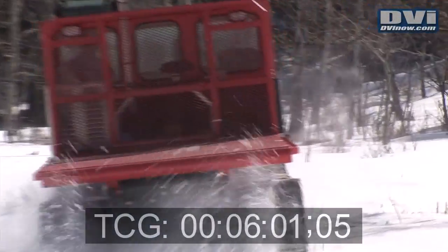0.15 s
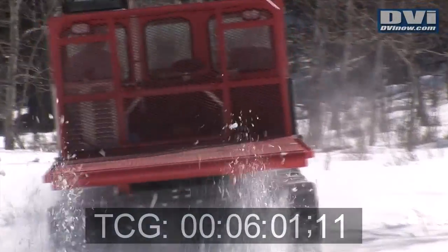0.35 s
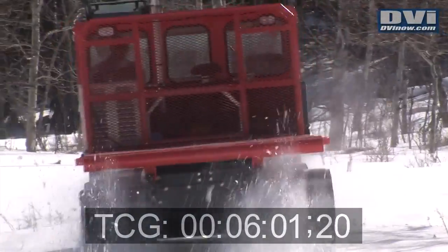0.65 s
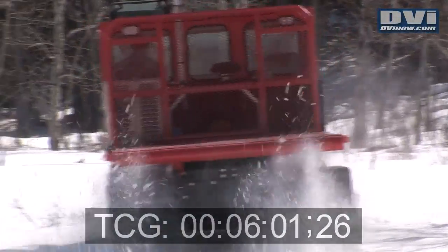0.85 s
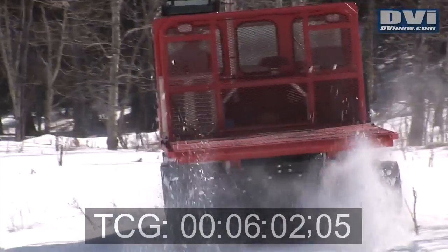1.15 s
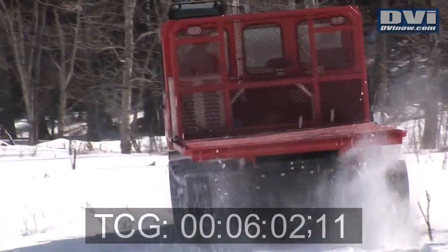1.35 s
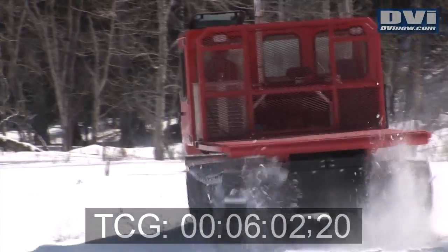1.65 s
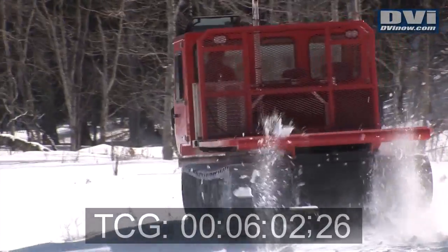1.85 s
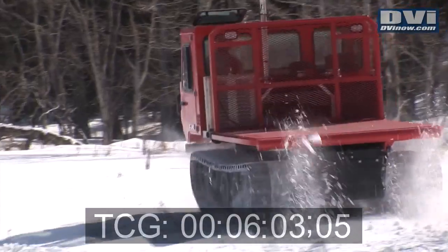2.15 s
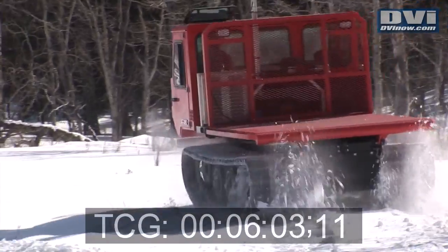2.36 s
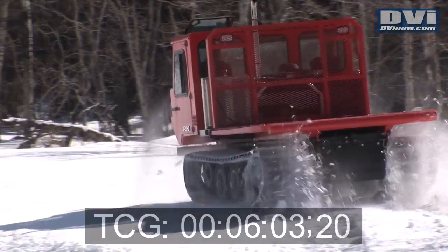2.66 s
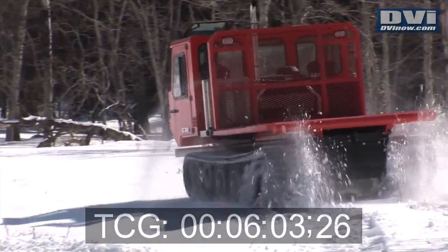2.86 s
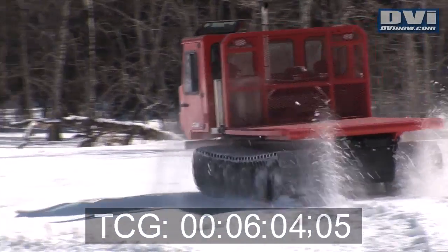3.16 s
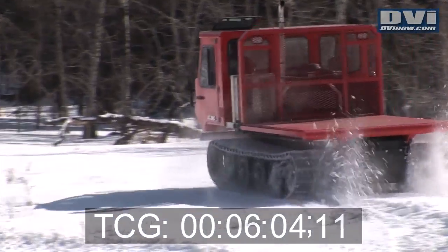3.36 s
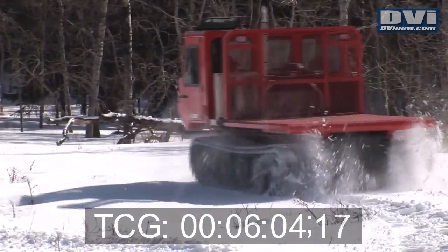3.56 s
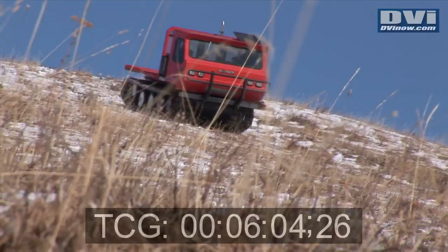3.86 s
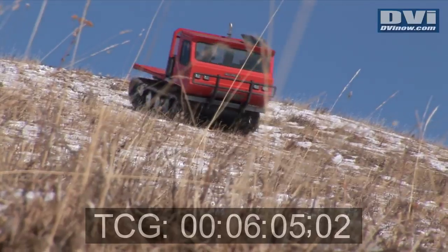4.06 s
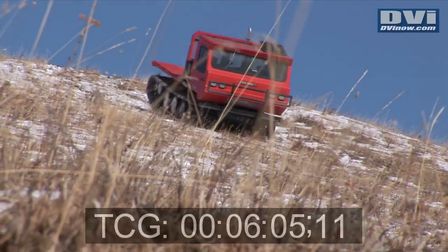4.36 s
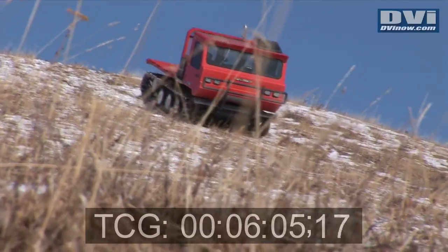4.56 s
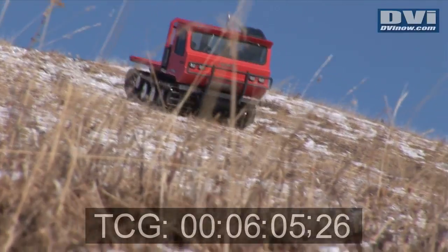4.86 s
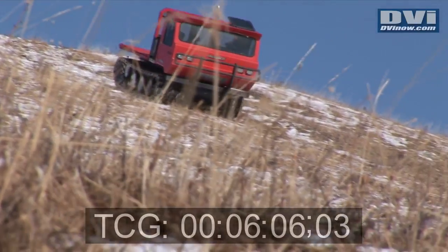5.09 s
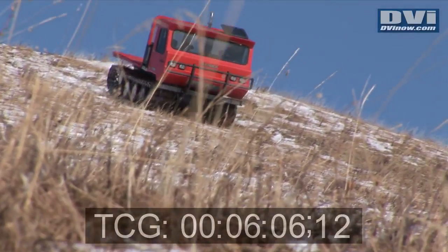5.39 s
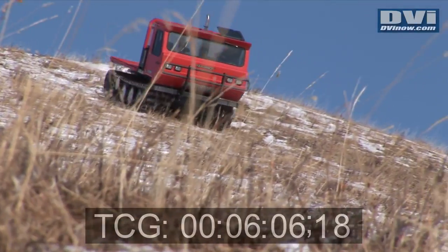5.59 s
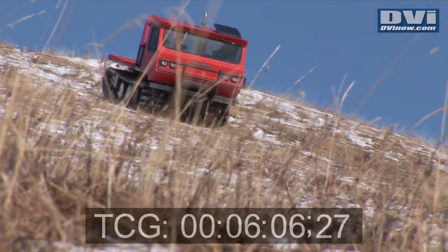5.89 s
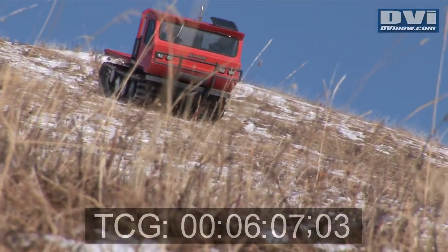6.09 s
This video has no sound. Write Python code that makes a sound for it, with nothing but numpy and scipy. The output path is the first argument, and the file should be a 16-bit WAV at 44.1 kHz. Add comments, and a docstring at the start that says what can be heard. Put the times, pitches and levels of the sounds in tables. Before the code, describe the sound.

Close to the microphone, a tracked diesel vehicle ploughs through deep snow. The exhaust throbs and the hull drums while steel tracks clatter, clink and slap, with churning snow and a faint high whistle. After about four seconds the sound changes abruptly to the same vehicle far off on a hill: a quiet wavering drone, soft low bumps and thin rattling in light wind. A faint electronic whine and hiss run underneath.

```python
"""Tracked carrier in snow, then on a far hill

Close to the microphone a diesel carrier ploughs through deep snow: the exhaust throbs, sprockets hum,
the hull drums, steel tracks clatter and clink, snow sprays and a thin whistle flutters. Then the scene
changes abruptly: the carrier crawls over a distant grassy hill, a low drone with soft bumps and faint
rattle in light wind. The camera's own whine and microphone hiss lie under both."""
import sys
import numpy as np
from scipy import signal
from scipy.fft import rfft, irfft, next_fast_len
from scipy.io import wavfile
from scipy.ndimage import map_coordinates

SR = 44100
rng = np.random.default_rng(int(sys.argv[2]) if len(sys.argv) > 2 else 0)


def materialize(psi):
    """Save the field psi as 16-bit PCM at rate SR to the path in sys.argv[1].

    A 1-D psi becomes a single channel; in a 2-D psi each row is a channel.
    """
    bounded = np.clip(np.atleast_2d(psi).T, -1, 1)
    quanta = np.round(bounded * 32767).astype(np.int16)
    wavfile.write(sys.argv[1], SR, quanta)


N = 274743
T = np.arange(N) / SR
CUT_S = 3.84  # from the snow to the hill
LINK_T60_S, RECEDE_DB_PER_S = 0.16, 1.5  # ring time of a link; fade of hull and sprockets

# At the microphone, whine partials and hiss spectrum: (frequency [Hz], level [dB])
CAMERA_WHINE = [(2397, -79), (2697, -80), (4195, -90), (4795, -79.5), (5095, -85), (5694, -94),
                (6293, -101), (6595, -102)]
MIC_HISS = [(200, 11), (700, 22.5), (2000, -5), (4400, 5), (5000, 9.5), (5500, 3.5), (8000, -6),
            (13000, -7), (14300, -11), (15200, -12)]
# Stereo width of hiss, hill and close pass: (frequency [Hz], side minus mid [dB])
HISS_WIDTH = [(500, 0.5), (3000, -11.5), (8000, 8.5)]
FAR_WIDTH = [(25, -11), (55, -3), (110, -26), (170, -19), (400, -14), (850, -3), (1400, -10.5), (2100, -25),
             (3000, -73), (4400, -45)]
NEAR_WIDTH = [(60, -67), (150, -78), (220, -33), (330, -18.5), (700, -15), (1300, -15.5), (2200, -21.5),
              (3000, -48.5), (4300, -6.5), (5000, -8.5), (6200, 0.5), (8000, -0.5), (10500, -26),
              (15000, 1)]

# Spectra heard from the hill: (frequency [Hz], relative level [dB])
WISP_SPECTRUM = [(10500, -33), (12400, 0), (13200, 0), (14800, -25)]
RUMBLE_SPECTRUM = [(15, -37), (26, -20), (38, -8), (55, -5), (85, 0.5), (115, 1), (150, 1.5), (190, -5),
                   (250, -21), (400, -33), (800, -51.5)]
GRUMBLE_SPECTRUM = [(120, -5), (200, 8), (270, 1), (350, -3), (460, -23), (700, -26), (1500, -44)]
RATTLE_SPECTRUM = [(300, -14), (700, -18.5), (1200, -7), (1420, -10), (1600, -4.5), (1790, -9.5),
                   (1900, -2), (2150, 0), (2400, -0.5), (2560, -4.5), (3150, -5.5), (3320, -13),
                   (3850, -17), (4400, -35), (7000, -58)]
# How hard the distant tracks work: (time [s], level [dB])
FAR_TRACK_WORK = [(3.84, -62), (4.08, -63), (4.27, -62.5), (4.38, -62), (4.47, -62), (4.8, -63),
                  (5.27, -66), (5.55, -61.5), (5.68, -62.5), (5.85, -61), (6.13, -64), (6.23, -62.5)]
# Steel ringing in the distant rattle: (frequency [Hz], width [Hz], level [dB])
FAR_STEEL_MODES = [(851, 50, 9), (1210, 90, -3), (1522, 70, 4), (1715, 92, 3), (2800, 110, -1),
                   (3080, 130, -2)]
# Distant engine drone: (time [s], pitch [Hz])
DRONE_PITCH = [(3.84, 143), (4.05, 144), (4.3, 149), (4.6, 157), (5.15, 157), (5.35, 145), (5.48, 153.3),
               (5.95, 150), (6.23, 153)]
# Track clanks and engine pulls on the hill: (middle [s], half length [s], rise [dB])
FAR_CLANKS = [(4.095, 0.022, 2.5), (4.35, .018, 4), (5.85, .018, 1.5)]
ENGINE_PULLS = [(4.04, 0.043, 13), (4.28, .09, 6.5), (4.62, 0.044, 14.5), (5.2, 0.045, 10), (5.48, 0.04, 4),
                (5.98, 0.071, 7.5)]
# Hull booms on uneven ground, near and far: (time [s], peak [dB], pitch [Hz])
HULL_BUMPS = [(.45, -32.5, 152), (2.0, -35.5, 152), (4.12, -43.5, 110.9), (4.2, -49, 108),
              (4.27, -43, 92.6), (4.34, -47, 96), (4.88, -59, 106), (4.95, -47, 79), (5.04, -47, 125),
              (5.7, -46, 122), (5.86, -56, 133)]

# Close whistle's pitch and engine firing rate: (time [s], frequency [Hz])
WHISTLE_PITCH = [(0, 13000), (.95, 12750), (1.55, 11970), (2.15, 12500), (2.5, 12300), (3.1, 12860),
                 (3.8, 12810)]
FIRING_RATE = [(0, 79.05), (.38, 77.5), (.75, 78.36), (.95, 83.1), (1.5, 79.6), (1.9, 78.7), (2.25, 79.5),
               (2.6, 78.5), (3.3, 79.5), (3.84, 78.8)]
# Load on the drive and work of the running gear, close by: (time [s], level [dB])
DRIVE_LOAD = [(0.0, -26), (0.06, -36), (0.13, -23), (0.2, -29.5), (.27, -29.5), (0.47, -46), (0.61, -28),
              (.68, -35.5), (0.88, -30.5), (0.99, -46), (1.06, -35.5), (1.87, -33.5), (1.91, -48),
              (1.96, -30), (2.0, -46), (2.04, -26.5), (2.08, -53), (2.14, -30), (2.45, -37), (2.51, -51),
              (2.58, -38.5), (2.74, -33), (2.92, -33.5), (3.02, -40), (3.2, -35.5), (3.39, -39.5),
              (3.44, -55), (3.52, -32.5), (3.61, -48), (3.69, -34), (3.82, -47.5)]
TRACK_WORK = [(0.02, -32), (0.28, -30.5), (.5, -31.5), (0.72, -32.5), (0.82, -33), (1.02, -32.5),
              (1.1, -35), (1.62, -34), (2.2, -34.5), (2.3, -33.5), (2.6, -32.5), (2.93, -34), (3.22, -36.5),
              (3.82, -36)]
# Whistle flares, flung sheets of snow, hard sprocket bites: (middle [s], half length [s], rise [dB])
WHISTLE_FLARES = [(.48, 0.28, 8), (1.05, .2, 1), (2.16, 0.07, 11), (2.36, 0.078, 8), (2.75, 0.14, 10),
                  (3.2, 0.27, 5), (3.63, 0.1, 4)]
SNOW_THROWS = [(.17, 0.33, 4.5), (1.9, 0.53, 2.5), (2.78, 0.13, 4), (3.2, 0.12, 3.5)]
SPROCKET_BITES = [(.2, .08, 6), (.8, 0.25, 9.5), (1.85, .1, 4), (2.25, .12, 7.5), (2.58, .06, 2)]
# Running gear singing under friction: (middle [s], half length [s], pitch [Hz], level [dB])
GEAR_NOTES = [(0.844, 0.096, 604, -43.5), (0.913, 0.16, 724, -48.5), (1.04, 0.16, 2340, -46),
              (1.2, 0.18, 440.5, -52.5), (1.556, 0.18, 574, -51), (1.703, 0.27, 343, -52),
              (1.616, 0.26, 968, -49.5), (1.75, 0.36, 2235, -52), (2.303, 0.39, 1228, -50),
              (2.315, 0.28, 960, -58), (2.531, 0.39, 1508, -46.5), (2.56, 0.14, 1880, -49),
              (2.98, 0.21, 1592, -48.5), (3.052, 0.31, 127.3, -43.5), (3.553, 0.14, 2262, -48.5),
              (3.66, 0.25, 3620, -49), (3.682, 0.35, 1580, -49.5)]
# Track slapping the wheels: (time [s], level [dB], burst centre [Hz])
TRACK_SLAPS = [(0.243, -30, 2200), (0.304, -29.5, 3400), (.425, -42, 2000), (0.4814, -35.5, 1100),
               (.805, -31, 2380), (0.83, -31.5, 546), (.858, -36, 2770), (.898, -37, 2300),
               (.96, -31, 2963), (2.241, -34.5, 2700), (2.271, -33, 2680), (2.305, -40, 2900),
               (2.399, -31.5, 1830), (2.64, -33, 2000), (3.519, -33.5, 1950), (3.698, -35, 3540)]
# Modes of the steel links: (frequency [Hz], relative level [dB])
LINK_MODES = [(1510, 9.5), (1585, -0.5), (1882, 3), (2225, -0.5), (2385, -1.5), (2750, -2), (2895, 1.5),
              (3110, -4), (3440, -6), (3670, -4.5), (3746, -2.5)]
# Modes of frame and deck panels: (frequency [Hz], width [Hz], level [dB])
PANEL_MODES = [(335, 9.2, 7), (430, 47, 1), (482, 15, 1), (598, 27, 3.5), (726, 49, 4), (878, 48, 1.5),
               (961, 24, 6), (1115, 57, 4), (1210, 56, 4), (1460, 45, -2), (1610, 44, -0.5), (1914, 36, -1),
               (2240, 45, -3), (3020, 36, -2), (3700, 68, -9)]
# Spectra heard beside the carrier: (frequency [Hz], relative level [dB])
STRUCK_SPECTRUM = [(200, -13), (450, -10.5), (3750, 1.5), (4300, -21), (5000, -20), (7000, -42),
                   (12000, -65)]
CHURN_SPECTRUM = [(100, -22), (200, -4), (260, -1.5), (520, 0.5), (800, -1.5), (1060, -1.5), (1320, -6.5),
                  (1700, -11), (3000, -12.5), (5000, -73)]
CLATTER_SPECTRUM = [(700, -22), (1300, -6.5), (1520, 0), (1790, -1), (2250, 0.5), (2900, -0.5), (3250, -2),
                    (3750, -5), (4100, -12.5), (4500, -26), (4980, -16.5), (5600, -33.5), (7200, -39.5),
                    (12000, -72)]
SPRAY_SPECTRUM = [(3000, -25), (5800, 4), (7400, -3.5), (8200, 1), (8900, -3), (9700, 2.5), (10400, -2.5),
                  (11000, -0.5), (12000, -4), (13300, 0), (15000, -9.5), (16000, -10)]
HULL_SPECTRUM = [(15, -43), (27, -43), (35, -21), (44, -14), (62, -5.5), (80, -1.5), (100, 0), (130, -3),
                 (160, -4.5), (212, -16), (320, -61), (700, -85)]
SILENCER_SPECTRUM = [(20, -44), (35, -16), (48, -15), (78, 7), (110, -29), (160, -11), (240, -31),
                     (500, -56), (1000, -100)]


def amp(db):
    """Decibels to gain."""
    return 10 ** (np.asarray(db) / 20)


def unit(x):
    """Scale to rms 1."""
    return x / np.sqrt(np.mean(x ** 2) + 1e-20)


def gain_at(points, hz):
    """Gain between (frequency [Hz], level [dB]) points on a log axis."""
    freqs, db = np.transpose(points)
    return amp(np.interp(np.log(hz + 1), np.log(freqs + 1), db))


def curve(rows):
    """One value per sample from (time, value) rows."""
    return np.interp(T, *np.transpose(rows))


def swells(rows):
    """Sum of bell-shaped rises in dB."""
    return sum(db * np.exp(-((T - s) / half) ** 2) for s, half, db in rows)


def wobble(rate):
    """A smooth random curve, rate knots a second."""
    return map_coordinates(rng.standard_normal(int(N * rate / SR) + 4), [T * rate])


def filtered(x, response):
    """Shape x by a gain that depends on frequency."""
    size = next_fast_len(N + SR // 2)
    return irfft(rfft(x, size) * response(np.fft.rfftfreq(size, 1 / SR)), size)[..., :N]


def noise():
    """Two unrelated white noises."""
    return rng.standard_normal((2, N))


def grains(rate, spread_db):
    """Two streams of random tiny impacts of uneven size, rms 1."""
    hits = rng.random((2, N)) < rate / SR
    return unit(hits * noise() * amp(spread_db * np.clip(noise(), -2, 2)))


def stereo(pair, spectrum, width=NEAR_WIDTH):
    """Colour two unrelated signals and spread them as mid (rms 1) and side."""
    mid = filtered(pair[0], lambda hz: gain_at(spectrum, hz))
    side = filtered(pair[1], lambda hz: gain_at(spectrum, hz) * gain_at(width, hz))
    return np.array([mid + side, mid - side]) / np.std(mid)


def panels(hz, modes=PANEL_MODES):
    """The frame's resonances stand out of a flat response."""
    peaks = sum(amp(db) ** 2 / (1 + (2 * (hz - f) / width) ** 2) ** 2 for f, width, db in modes)
    return np.sqrt(1 + peaks)


def camera(hiss_db=-74):
    """Right at the microphone: the camera's steady whine and hiss."""
    whine = sum(amp(db) * np.sin(2 * np.pi * (hz * T + rng.random())) for hz, db in CAMERA_WHINE)
    return np.sqrt(2) * whine + amp(hiss_db) * stereo(noise(), MIC_HISS, HISS_WIDTH)


def wisp(at_s=5.59, half_s=0.027, level_db=-80):
    """One faint, high wisp of sound."""
    return amp(level_db) * np.exp(-((T - at_s) / half_s) ** 2) * stereo(noise(), WISP_SPECTRUM)


def far_rumble(level_db=-49.5, fade_db_per_s=0.1):
    """Light wind and tracks rolling on the hill merge into a low rumble."""
    db = level_db - fade_db_per_s * (T - CUT_S) + 0.8 * wobble(15)
    return amp(db) * stereo(noise(), RUMBLE_SPECTRUM, FAR_WIDTH)


def far_grumble(level_db=-66.5, follows=2.7):
    """The distant tracks grumble louder the harder they work."""
    work_db = curve(FAR_TRACK_WORK)
    effort_db = work_db - work_db[T > CUT_S].mean()
    return amp(level_db + follows * effort_db) * stereo(noise(), GRUMBLE_SPECTRUM, FAR_WIDTH)


def far_rattle(gain_db=4, grit=0.46):
    """Thin steel rattle carries from the hill, clanking as the tracks slap the wheels."""
    impacts = noise() + grit * grains(700, spread_db=1)
    steel = filtered(impacts, lambda hz: panels(hz, FAR_STEEL_MODES))
    db = curve(FAR_TRACK_WORK) + gain_db + swells(FAR_CLANKS) + 0.27 * wobble(25)
    return amp(db) * stereo(steel, RATTLE_SPECTRUM, FAR_WIDTH)


def far_drone(level_db=-57.5):
    """At a distance the engine is one wavering note that swells as it pulls."""
    pitch_hz = curve(DRONE_PITCH) * (1 + 0.018 * wobble(24))
    tone = np.sin(2 * np.pi * np.cumsum(pitch_hz) / SR)
    return amp(level_db + swells(ENGINE_PULLS)) * unit(tone * amp(1.3 * wobble(22)))


def bumps(rise_s=0.021):
    """Near or far, each drop over uneven ground is one soft, low boom of the hull."""
    out = np.zeros(N)
    for s, db, hz in HULL_BUMPS:
        age = np.maximum(T - s, 0) / rise_s
        out += amp(db) * age * np.exp(1 - age) * np.sin(2 * np.pi * (hz * T + rng.random()))
    return out


def high_whistle(level_db=-76, width_hz=250, flutter_db=3):
    """Close by, a thin, high, fluttering whistle drifts in pitch."""
    breath = filtered(noise(), lambda hz: 1 / (1 + (hz / width_hz) ** 2))
    phase = 2 * np.pi * np.cumsum(curve(WHISTLE_PITCH)) / SR
    db = level_db + swells(WHISTLE_FLARES) + flutter_db * wobble(21.96)
    return amp(db) * unit(breath[0] * np.cos(phase) + breath[1] * np.sin(phase))


def singing_gear():
    """Friction keeps single resonances ringing; each swells and fades, the low ones steadier."""
    out = np.zeros(N)
    for s, half, hz, db in GEAR_NOTES:
        phase = 2 * np.pi * hz * T
        drift_rate = 26 * np.sqrt(hz / 1000)
        ring = unit(wobble(drift_rate) * np.cos(phase) + wobble(drift_rate) * np.sin(phase))
        out += amp(db) * np.exp(-0.5 * ((T - s) / half) ** 4) * ring
    return out


def slaps(t60_s=0.19, rise_s=0.0024, width_octaves=0.7, ring_db=-6):
    """A slack track slaps a wheel: a dull or bright burst, cushioned by snow; the links ring with it."""
    out = np.zeros((2, N))
    for s, db, centre_hz in TRACK_SLAPS:
        colour = lambda hz: 1 / (1 + (np.log2((hz + 1) / centre_hz) / width_octaves) ** 2)
        burst = stereo(filtered(noise(), lambda hz: panels(hz) * colour(hz)), STRUCK_SPECTRUM)
        ring = sum(amp(mode_db + ring_db) * colour(hz) ** 2 * np.sin(2 * np.pi * (hz * T + rng.random()))
                   for hz, mode_db in LINK_MODES) / np.sqrt(len(LINK_MODES))
        onset = 0.5 + 0.5 * np.tanh((T - s + rise_s) / rise_s)
        age = np.abs(T - s)
        out += amp(db) * onset * (burst * amp(-60 * age / t60_s) + ring * amp(-60 * age / LINK_T60_S))
    return out


def clinks(taps_per_s=30, gain_db=-12):
    """Loose links tap the wheels at random; every tap rings one of their modes."""
    age = np.arange(SR // 2) / SR
    rings = np.zeros((2, N))
    for hz, db in LINK_MODES:
        ring = amp(db - 60 * age / LINK_T60_S) * np.sin(2 * np.pi * hz * age)
        rings += signal.fftconvolve(grains(taps_per_s, spread_db=1), [ring], axes=1)[:, :N]
    return amp(curve(TRACK_WORK) + gain_db) * stereo(rings, STRUCK_SPECTRUM)


def tracks(lug_hz=22, grit=0.44, churn_db=-5, clatter_db=-2.5, spray_db=-32):
    """Beside the microphone lugs churn snow and steel rattles in surges; snow sprays off the rear."""
    lug_phase = 2 * np.pi * np.cumsum(lug_hz * (1 + 0.144 * wobble(5))) / SR
    surge = (1 + 0.02 * np.cos(lug_phase)) * amp(0.57 * wobble(35.99) + 0.47 * wobble(9.6))
    snow = surge * (noise() + grit * grains(500, spread_db=1))
    steel = surge * (noise() + grit * grains(900, spread_db=2.5))
    powder = noise() + 0.48 * grains(1200, spread_db=7)
    churn = amp(churn_db + 0.02 * T) * stereo(filtered(snow, panels), CHURN_SPECTRUM)
    clatter = amp(clatter_db) * stereo(filtered(steel, panels), CLATTER_SPECTRUM)
    spray = amp(spray_db + swells(SNOW_THROWS) + 1.7 * wobble(11)) * stereo(powder, SPRAY_SPECTRUM)
    return amp(curve(TRACK_WORK)) * (churn + clatter + spray)


def sprockets(tooth_hz=33.96, harmonics_db=(-60.5, -49.5, -44.5), sway_db=2.2):
    """Sprocket teeth bite the tracks in a low hum; its top note swells with each hard bite."""
    phase = 2 * np.pi * np.cumsum(tooth_hz * (1 + 0.0272 * wobble(7.13))) / SR
    first, second, third = (amp(db + sway_db * wobble(14)) * np.cos(k * phase)
                            for k, db in enumerate(harmonics_db, 1))
    hum = first + second + amp(swells(SPROCKET_BITES)) * third
    return np.sqrt(2) * amp(-RECEDE_DB_PER_S * T) * hum


def hull(gain_db=-0.2, follows=0.21, boom_above_hz=128, boom_db=6, dulling_db_per_s=3):
    """Pounding tracks drum the hull, partly following the load; it dulls as the carrier draws away."""
    load_db = curve(DRIVE_LOAD)
    mean_db = load_db[T < CUT_S].mean()
    db = mean_db + follows * (load_db - mean_db) + gain_db - RECEDE_DB_PER_S * T
    drum = stereo(grains(2000, spread_db=0.5), HULL_SPECTRUM)
    boom = filtered(drum, lambda hz: 1 - 1 / (1 + (hz / boom_above_hz) ** 10))
    return amp(db) * (drum - boom + amp(boom_db - dulling_db_per_s * T) * boom)


def exhaust(gain_db=-5.5, roughness=0.16, tone_db=-1, puffs_db=-9):
    """The close diesel throbs: one uneven puff per firing through the silencer, over a firing tone."""
    cycles = np.cumsum(curve(FIRING_RATE) * (1 + 0.0093 * wobble(12))) / SR
    firings = np.diff(np.floor(cycles), prepend=0) * (1 + roughness * rng.standard_normal(N))
    puffs = unit(filtered(firings, lambda hz: gain_at(SILENCER_SPECTRUM, hz)))
    tone = np.sqrt(2) * np.cos(2 * np.pi * cycles) * amp(0.75 * wobble(12.3))
    return amp(curve(DRIVE_LOAD) + gain_db) * (amp(tone_db) * tone + amp(puffs_db) * puffs)


def scene():
    """The close pass in the snow gives way at once to the distant hill."""
    close = exhaust() + sprockets() + hull() + tracks() + clinks() + slaps()
    close += singing_gear() + high_whistle()
    hill = far_drone() + far_rumble() + far_grumble() + far_rattle() + wisp()
    away = 0.5 + 0.5 * np.tanh((T - CUT_S) / 0.0006)
    return (1 - away) * close + away * hill + bumps() + camera()


def record(dry):
    """The microphone chain passes nothing above 15.3 kHz."""
    return filtered(dry, lambda hz: hz < 15300)


dry = scene()
out = record(dry)
materialize(out)
```